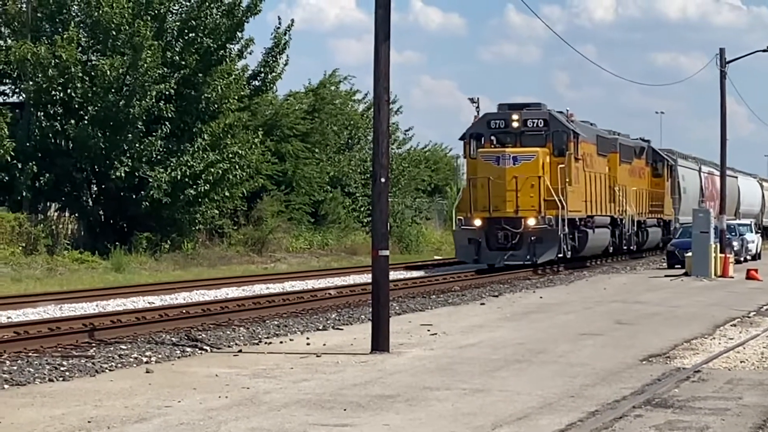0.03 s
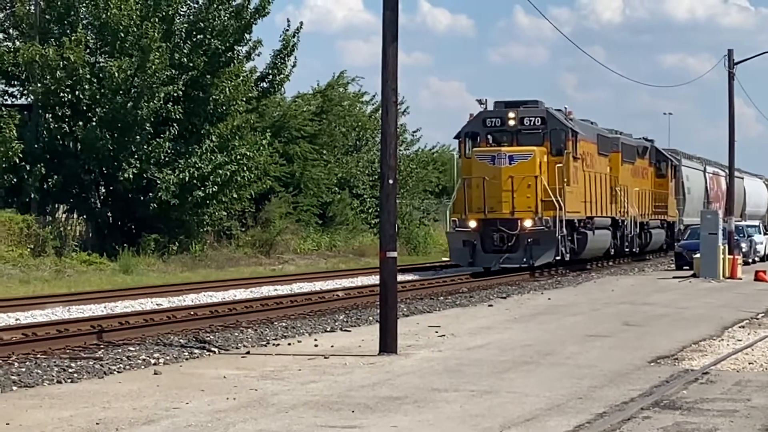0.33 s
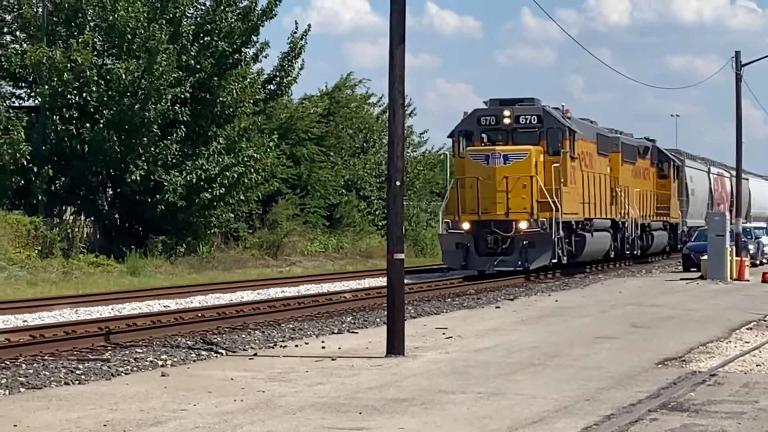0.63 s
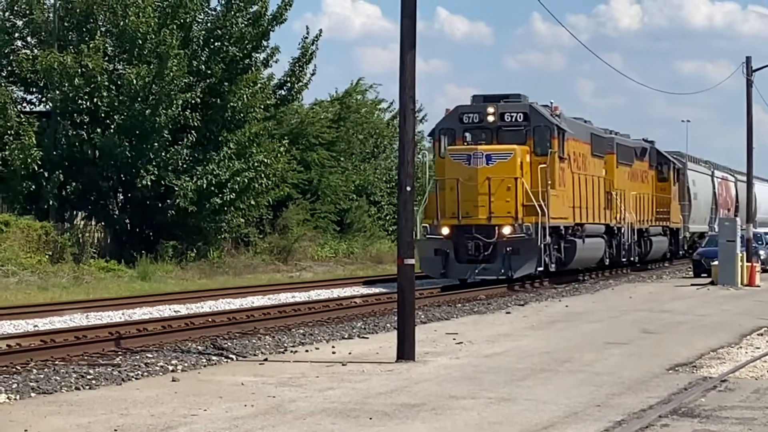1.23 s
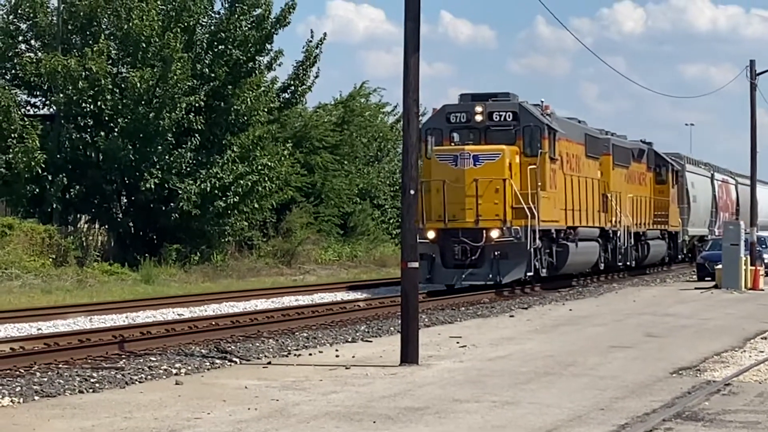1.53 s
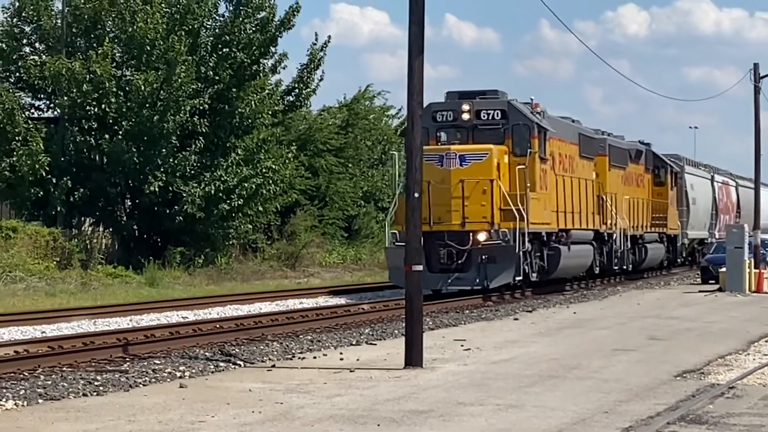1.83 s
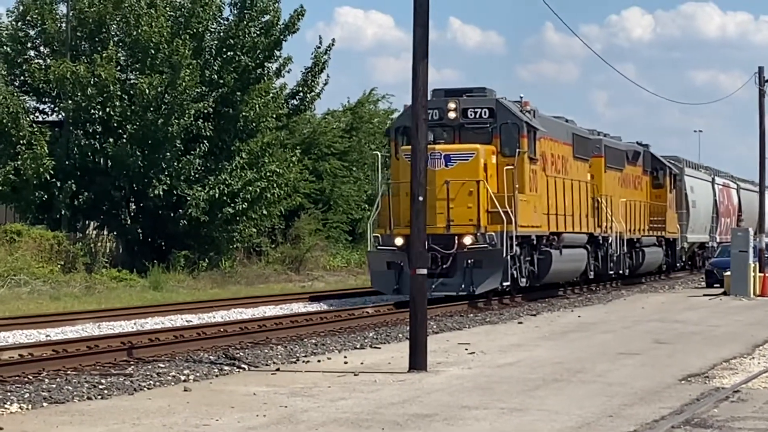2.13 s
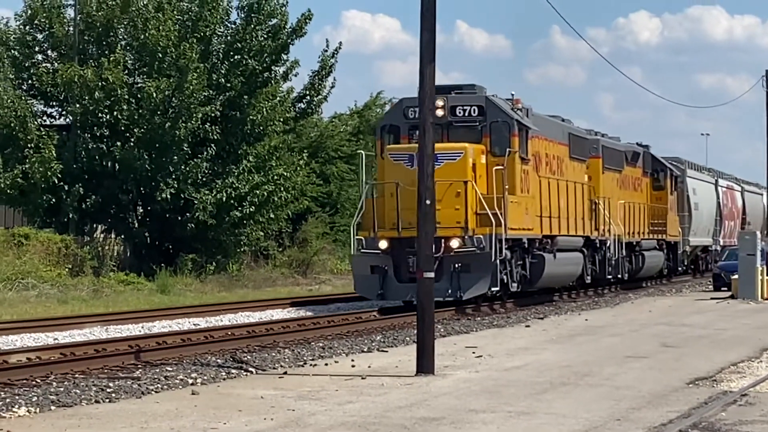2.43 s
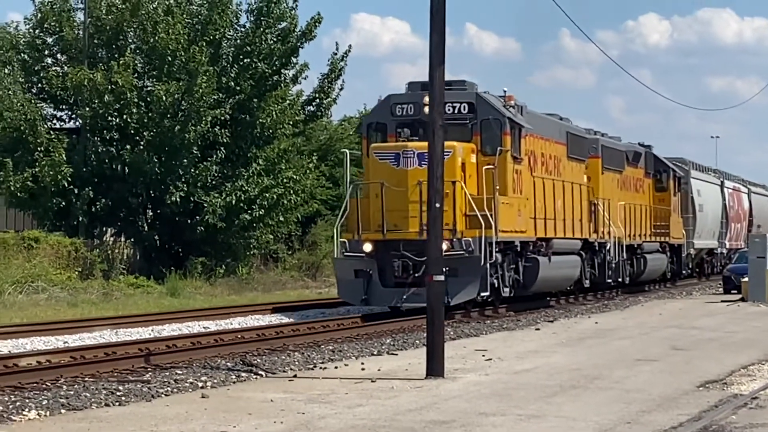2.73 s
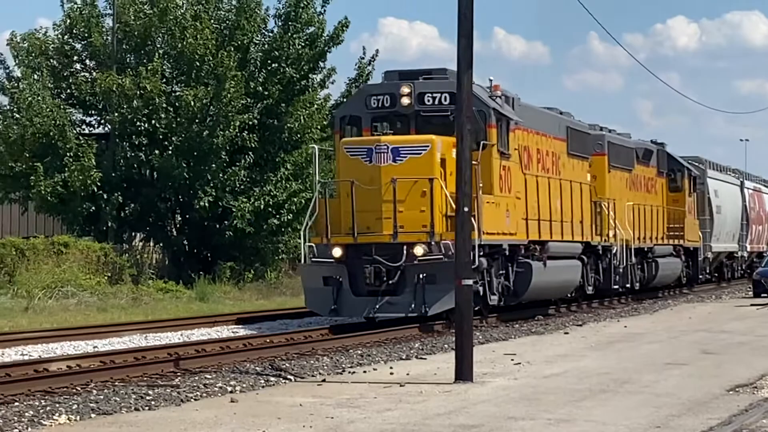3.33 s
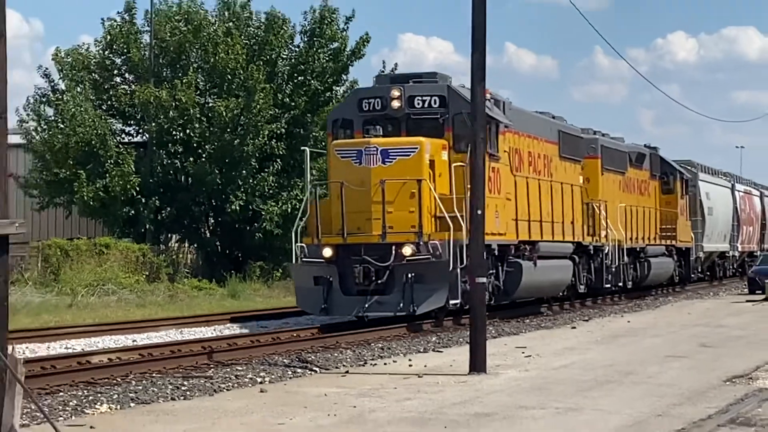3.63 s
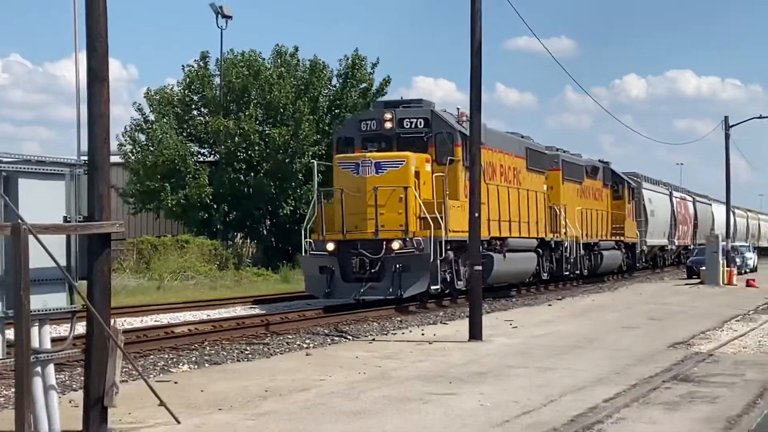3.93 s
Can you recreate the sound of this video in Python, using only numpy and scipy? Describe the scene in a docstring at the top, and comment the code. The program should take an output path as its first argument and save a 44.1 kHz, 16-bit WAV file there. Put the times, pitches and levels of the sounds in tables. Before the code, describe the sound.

A locomotive bell clangs six times at an even pace, echoing off nearby trees. Beneath it, diesel engines throb and wheels grow louder as the train slowly approaches, while gusts of wind buffet the trackside phone microphone.

```python
"""Two diesel locomotives roll slowly towards a phone microphone at the trackside, the lead one ringing
its bell. An air clapper strikes the bell evenly, and a line of trees returns it late and a little flat.
The exhaust throbs and booms, blowers whine, and the wheels grow louder as the distance closes.
Gusts of wind buffet the microphone."""
import sys
import numpy as np
from scipy import signal
from scipy.fft import rfft, irfft
from scipy.io import wavfile
from scipy.ndimage import map_coordinates

SR = 44100
rng = np.random.default_rng(int(sys.argv[2]) if len(sys.argv) > 2 else 0)


def dump_mix(stems):
    """Bounce the given channels to the path in sys.argv[1] as a 16-bit WAV at rate SR."""
    frames = np.atleast_2d(stems).T  # one column per channel
    limited = np.clip(frames, -1, 1)  # hard clip at full scale
    pcm = np.round(limited * 32767).astype(np.int16)
    wavfile.write(sys.argv[1], SR, pcm)


N = 176400

# stereo width of the train's noise at the microphone: frequency_hz, side_minus_mid_db
STEREO_WIDTH = [(60, -21.5), (180, -11.5), (320, -12.5), (550, -8.5), (1500, -0.5), (2500, -14),
                (4000, -114.5), (7500, -1)]


def undb(db):
    """Decibels to gain."""
    return 10 ** (np.asarray(db) / 20)


def unit(x):
    """Scale to rms 1."""
    return x / np.sqrt(np.mean(x ** 2))


def clock():
    """Time of every sample in seconds."""
    return np.arange(N) / SR


def per_bin(points):
    """Join (frequency_hz, value) points on a log-frequency axis, one value per FFT bin."""
    hz, value = np.array(points, float).T
    bin_hz = np.arange(N // 2 + 1) * SR / N
    return np.interp(np.log(bin_hz + 1e-3), np.log(hz), value)


def colour(x, points):
    """Filter by (frequency_hz, gain_db) points."""
    return irfft(rfft(x) * undb(per_bin(points)), N)


def noise(points):
    """Coloured noise of rms 1."""
    return unit(colour(rng.standard_normal(N), points))


def walk(turns_per_s):
    """Smooth random wander with a spread near 1."""
    grid_s = np.arange(0, N + 64, 64) / SR
    wander = map_coordinates(rng.standard_normal(2048), [grid_s * turns_per_s], order=3, mode="mirror")
    return np.interp(clock(), grid_s, wander)


def stereo(mid, side):
    """Left and right from mid and side."""
    return np.array([mid + side, mid - side])


def wide_noise(points):
    """Coloured noise spread to the train's stereo width."""
    return stereo(noise(points), colour(noise(points), STEREO_WIDTH))


def tone(hz, waver_db):
    """A sine of rms about 1 whose level wavers in the moving air."""
    cycles = np.cumsum(hz) / SR + rng.random()
    return np.sqrt(2) * np.sin(2 * np.pi * cycles) * undb(waver_db * walk(5.79))


def struck(age, rise_s, t60_s):
    """Envelope of a blow: a quick rise, then a fall of 60 dB every t60_s."""
    return (1 - np.exp(-age / rise_s)) * np.exp(-np.log(1000) * age / t60_s)


def bell():
    """Each clapper blow clanks and starts all modes; close pairs beat, and each flutters on its way."""
    # clapper blows: start_s, treble_ring_ratio, low_db, main_db, high_db, top_db
    strikes = [(-.046, 1.42, -1.5, 1.1, -4, -4), (0.63, 1.13, -0.5, -0.74, -3.5, -5.5),
               (1.309, 1.1, 2.5, 1.1, -3, -6.5), (1.982, 0.95, 1, -0.4, -2.5, -3.5),
               (2.659, 0.91, 1.5, 0.7, 3.5, 0), (3.335, 0.6, 4.5, 3.5, -1.5, 2)]
    # centres of the low, main, high and top registers: pitch_hz
    registers_hz = [1750, 2900, 4200, 5600]
    # mode pairs: pitch_hz, level_db, t60_s, beat_hz, twin_ratio (negative starts opposed), flutter_db
    modes = [(1296, -25, 1.2, 2.5, 0.4, 2), (1556, -17, 1, 16, 0.7, 5), (1575, -18.5, 0.44, 10, 0.4, 4.5),
             (1757.5, -9, 2.3, 3.3, 0.58, 2.8), (2885, .5, 0.33, 4, 0.1, 0.5),
             (2894, 1, 1.55, 2.8, -0.08, 1.2), (3260, -17, .35, 8, 0.2, 2.5),
             (3575, -19.5, 0.35, 33, .5, 4), (2412, -25, 1.2, 5, .2, 2), (4122, -19, .7, 6, .3, 3),
             (4190, -7.3, 1.4, 4.3, -0.76, 1.5), (5583, -21, 1.7, 4, -.5, 3),
             (6900, -32, 1.3, 4, -0.2, 2.5)]
    # spectrum of the clapper's impact: frequency_hz, level_db
    clank_spectrum = [(700, -45), (1300, -25), (1540, 14), (1645, -2), (1750, 13), (1900, 1), (2300, -6),
                      (3500, -4), (4400, -22), (5900, -17), (7000, -24), (10000, -70.5)]
    bell_db, clank_db, treble_hz = -24.3, -29, 4000
    t, out = clock(), np.zeros(N)
    clank = undb(clank_db) * noise(clank_spectrum)
    flutters = [undb(flutter_db * walk(40)) for *_, flutter_db in modes]
    for start_s, treble_ring, *register_db in strikes:
        ringing = (t >= start_s) & (t < start_s + 2)
        age = t[ringing] - start_s
        out[ringing] += clank[ringing] * struck(age, rise_s=.001, t60_s=.29)
        for (hz, mode_db, t60_s, beat_hz, twin, _), flutter in zip(modes, flutters):
            pair = np.sin(2 * np.pi * hz * age) + twin * np.sin(2 * np.pi * (hz - beat_hz) * age)
            gain = undb(bell_db + mode_db + np.interp(hz, registers_hz, register_db))
            ring_s = t60_s * (treble_ring if hz > treble_hz else 1)
            out[ringing] += gain * pair * flutter[ringing] * struck(age, rise_s=.008, t60_s=ring_s)
    return out


def tree_echoes(direct, count=36):
    """Trees beside and behind the moving bell answer it: the farther, the later, flatter and weaker."""
    # colour of the echoes: frequency_hz, gain_db
    echo_colour = [(1700, 7), (3000, 3.5), (4200, -2.5), (5600, 6), (8000, -18), (10000, -28.5)]
    below_direct_db = -6.5
    far_delay_s, far_doppler_loss, far_fade_db = .19, .037, -17.5  # at distance 1, the farthest tree
    t, out = clock(), np.zeros((2, N))
    for distance, (scatter, bearing) in zip(np.linspace(.16, 1, count), rng.random((count, 2))):
        # a steadily growing delay lowers the pitch
        delay_s = distance * (far_delay_s * (.5 + scatter) + far_doppler_loss * (t - t.mean()))
        echo = undb(far_fade_db * distance) * np.interp(t - delay_s, t, direct, left=0)
        pan = .9 * (bearing - .5)
        out += echo * np.array([[1 + pan], [1 - pan]])
    return unit(colour(out, echo_colour)) * direct.std() * undb(below_direct_db)


def bell_at_microphone():
    """The bell and its echoes reach the two microphone ports slightly out of step."""
    # phase between the ports: frequency_hz, left_lead_rad
    port_phase = [(1000, 0.41), (1600, -0.88), (1800, -0.97), (2400, 1), (2900, 0.43), (3600, 0), (8000, 0)]
    direct = bell()
    half_lead = per_bin(port_phase) / 2
    phase_shift = np.exp(1j * np.array([half_lead, -half_lead]))
    return irfft(rfft(direct + tree_echoes(direct)) * phase_shift, N)


def firings(shaft_hz, cylinders=16):
    """Each cylinder fires once a turn, with a strength of its own that scatters from turn to turn."""
    cylinder_spread_db, scatter_db = 7, 3.5
    fired = np.flatnonzero(np.diff(np.floor(cylinders * np.cumsum(shaft_hz) / SR)))
    cylinder_db = np.resize(cylinder_spread_db * rng.standard_normal(cylinders), len(fired))
    strength = undb(cylinder_db + scatter_db * rng.standard_normal(2048)[:len(fired)])
    pulses = np.zeros(N)
    pulses[fired] = strength - strength.mean()
    return pulses


def engines(boom_db, drone_db, rumble_db):
    """Uneven firings and rushing gas fill the exhaust; shaft orders and the generator's hum stand out."""
    # spectrum of the exhaust rumble: frequency_hz, level_db
    exhaust = [(15, -38), (29, -16), (42, -14), (60, 6.5), (80, 1), (110, -5.5), (170, -9), (215, -8),
               (260, -10.5), (330, -16.5), (450, -32.5), (900, -67), (5000, -110)]
    # deep tones of the exhaust's boom: shaft_multiple, relative_db
    boom_orders = [(8, 3), (9, -3.5)]
    # higher tones of its drone: shaft_multiple, relative_db
    drone_orders = [(23, -7), (25, -5.5), (29, -10.5), (31, 3), (32, 3), (33, -5.5), (37, -8.5)]
    # the generator's hum swelling and sinking: time_s, level_db
    hum_levels = [(0, -42.5), (1, -34), (1.7, -23.5), (2.1, -36.5), (3.1, -24), (3.499, -25.5),
                  (3.8, -22.5), (4, -33)]
    speed = 1 + .0015 * walk(1.957)
    shaft_hz, hum_hz, pulse_db = 6.58 * speed, 122 * speed, -5.5
    throb = undb(pulse_db) * unit(colour(firings(shaft_hz), exhaust))
    rumble_mid = unit(noise(exhaust) + throb)
    boom = sum(undb(db) * tone(order * shaft_hz, waver_db=.1) for order, db in boom_orders)
    drone = sum(undb(db) * tone(order * shaft_hz, waver_db=.73) for order, db in drone_orders)
    rumble = stereo(rumble_mid, colour(noise(exhaust), STEREO_WIDTH))
    hum_db = np.interp(clock(), *np.array(hum_levels).T)
    hum = tone(hum_hz, waver_db=.7) * undb(hum_db)
    return rumble * undb(rumble_db) + hum + unit(boom) * undb(boom_db) + unit(drone) * undb(drone_db)


def whines():
    """Blowers and gears give wavering tones that grow as the train nears."""
    # blower and gear tones halfway through the approach: pitch_hz, level_db
    tones = [(517, -51.5), (610, -45.5), (941, -52), (1038, -51), (1177, -54.5), (1399, -55)]
    pitch_wander, rise_db_per_s = .007, 2
    t = clock()
    out = sum(undb(db) * tone(hz * (1 + pitch_wander * walk(35)), waver_db=2) for hz, db in tones)
    return out * undb(rise_db_per_s * (t - t.mean()))


def wheels_and_fans(level_db):
    """Wheels and cooling fans roar with a light, uneven throb; the midrange grows as the wheels near."""
    # broad roar of wheels and fans: frequency_hz, level_db
    roar_spectrum = [(100, 5), (300, 1), (560, -0.5), (820, -3), (1100, -10.5), (1500, -10.5),
                     (2300, -16.5), (3500, -19.5), (5400, -26), (7000, -34), (8100, -40.5), (9000, -58.5),
                     (11000, -40.5), (13000, -59), (15000, -56.5)]
    # midrange of the wheels at close range: frequency_hz, level_db
    near_spectrum = [(200, -14.5), (350, 2), (800, 1.5), (1500, -19.5), (6000, -61)]
    near_end_db, rise_db_per_s = -33.5, 7.5
    throb = 1 + .085 * walk(50)
    near = wide_noise(near_spectrum) * undb(near_end_db + rise_db_per_s * (clock() - N / SR))
    return (wide_noise(roar_spectrum) * undb(level_db) + near) * throb


def wind():
    """Gusts buffet the microphone; the sharper ones break into quick eddies."""
    # gusts: centre_s, length_s, level_db, sharpness_db (weight of the gust's eddies)
    gusts = [(0.072, 0.075, -13.5, -5.5), (0.122, 0.012, -14.5, 5), (0.185, 0.03, -27, 9),
             (0.286, 0.011, -26, 5), (1.293, 0.12, -22, 0), (1.395, 0.018, -18.5, -2),
             (1.517, 0.15, -18.5, -23), (1.633, 0.035, -16.5, -4.5), (1.822, 0.14, -16.5, -4.5),
             (1.971, 0.031, -18, -1), (2.121, 0.091, -16, -4.5), (2.396, 0.39, -22.5, -6.5),
             (2.637, 0.053, -18, -3)]
    # low push of a gust: frequency_hz, level_db
    push_spectrum = [(20, -32), (45, 2), (90, 5), (180, -2), (280, -6), (420, -25.5), (900, -51),
                     (4000, -105)]
    # brighter swirl of its eddies: frequency_hz, level_db
    eddy_spectrum = [(100, -18), (220, 0.5), (340, 1.5), (480, -3), (700, -11.5), (1200, -28), (3000, -46),
                     (8000, -99.5)]
    eddy_db, side_db, flutter_db = -3, -11, 1.5
    t, out = clock(), np.zeros((2, N))
    push_power, eddy_power = np.zeros((2, N))
    for centre_s, length_s, level_db, sharpness_db in gusts:
        gust_power = undb(level_db) ** 2 * np.exp(-(2 * (t - centre_s) / length_s) ** 2)
        push_power += gust_power
        eddy_power += gust_power * undb(eddy_db + sharpness_db) ** 2
    for power, spectrum in [(push_power, push_spectrum), (eddy_power, eddy_spectrum)]:
        out += np.sqrt(power) * stereo(noise(spectrum), undb(side_db) * noise(spectrum))
    return out * unit(undb(flutter_db * walk(90)))


def eddy_knocks():
    """Single eddies knock on the microphone, each one quick push and pull of pressure."""
    # knocks: centre_s, envelope_peak_db
    knocks = [(.123, -12.5), (.184, -20), (.287, -23), (1.242, -19), (1.872, -10), (1.977, -11.5),
              (2.052, -9.5), (2.587, -10.5), (2.632, -11), (3.174, -16.5)]
    pitch_hz, half_width_s = 344, .0018
    out = np.zeros(N)
    for centre_s, peak_db in knocks:
        t = clock() - centre_s
        out += undb(peak_db) * np.exp(-(t / half_width_s) ** 2) * np.sin(2 * np.pi * pitch_hz * t)
    return out


def scene():
    """Bell, engines, wheels and wind as they meet at the trackside."""
    # the train's levels as it approaches: time_s, boom_db, drone_db, rumble_db, rolling_db
    approach = [(0, -46, -21, -19, -32), (.3, -41, -29, -29.5, -33), (0.549, -33, -28, -26.5, -33),
                (.75, -41, -20.5, -25, -31), (1, -25.5, -22.5, -18, -31.5), (1.6, -18.5, -22.5, -18, -31),
                (2.05, -35, -21.5, -17.5, -29.5), (2.3, -18.5, -28.5, -14.5, -29),
                (2.7, -18, -21.5, -12.5, -28), (3, -16, -22, -18.5, -28.5),
                (3.45, -15, -21.5, -18.5, -27.5), (3.8, -19, -19, -17, -27), (4, -15, -28, -14, -27.5)]
    times, *levels = np.array(approach, float).T
    boom_db, drone_db, rumble_db, rolling_db = (np.interp(clock(), times, db) for db in levels)
    train = bell_at_microphone() + engines(boom_db, drone_db, rumble_db) + whines()
    return train + wheels_and_fans(rolling_db) + wind() + eddy_knocks()


def record(dry):
    """The phone rounds only the highest peaks and cuts the top of the treble."""
    ceiling, knee_order, top_hz = .93, 8, 15700
    rounded = dry / (1 + (dry / ceiling) ** knee_order) ** (1 / knee_order)
    lowpass = signal.ellip(8, .2, 70, top_hz, fs=SR, output="sos")
    return signal.sosfilt(lowpass, rounded)


dry = scene()
out = record(dry)
dump_mix(out)
```